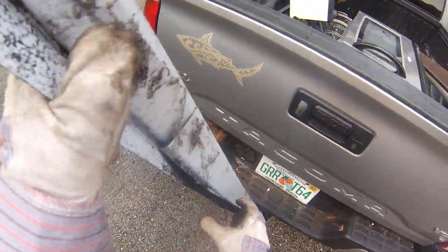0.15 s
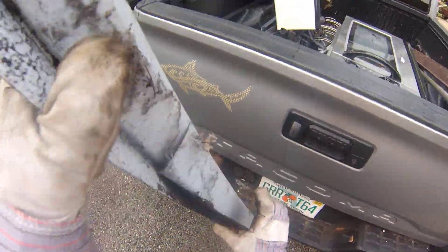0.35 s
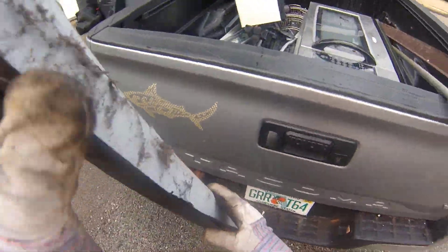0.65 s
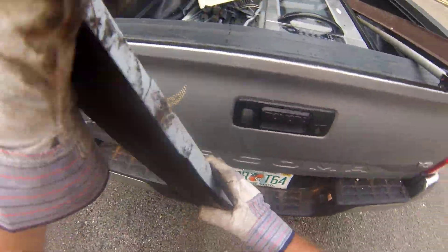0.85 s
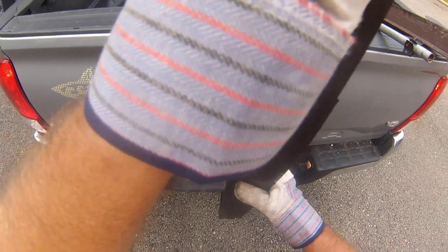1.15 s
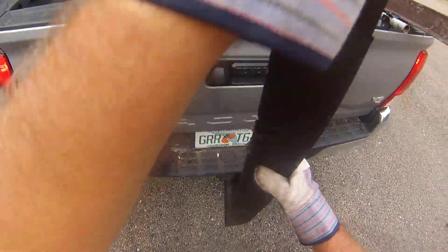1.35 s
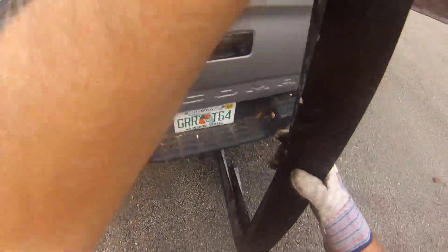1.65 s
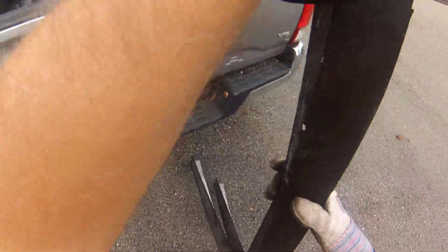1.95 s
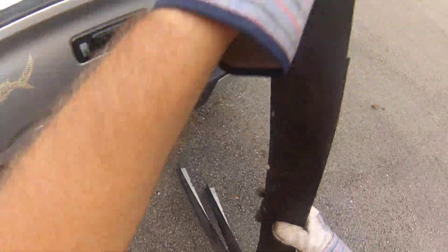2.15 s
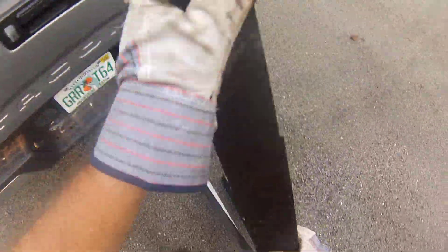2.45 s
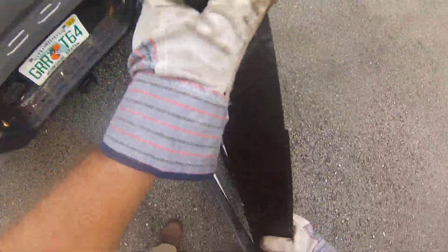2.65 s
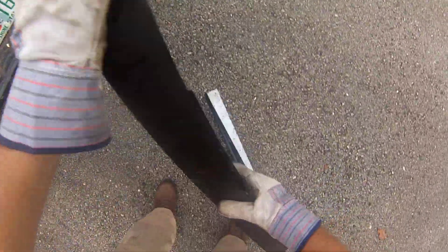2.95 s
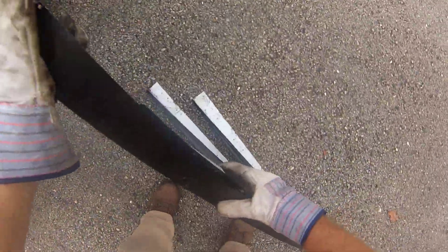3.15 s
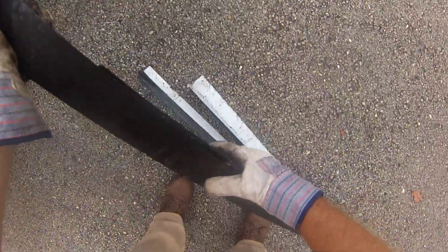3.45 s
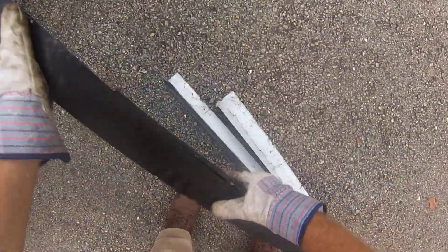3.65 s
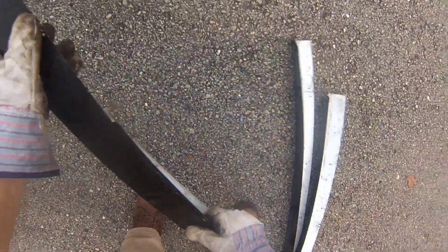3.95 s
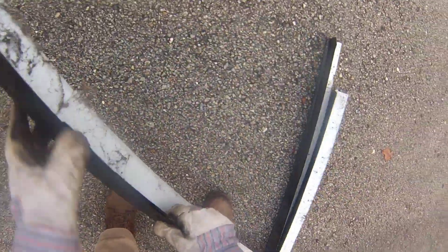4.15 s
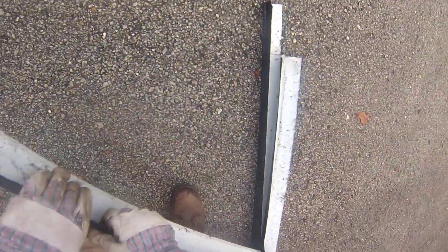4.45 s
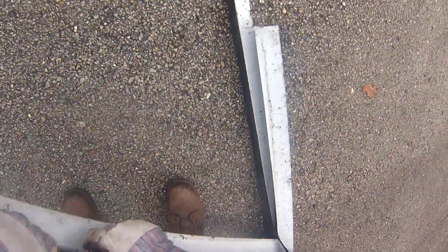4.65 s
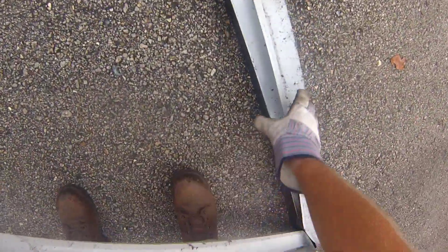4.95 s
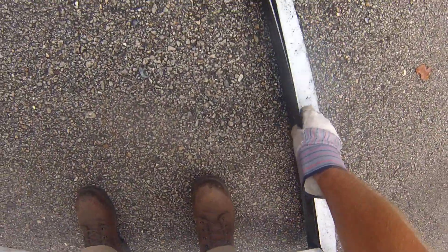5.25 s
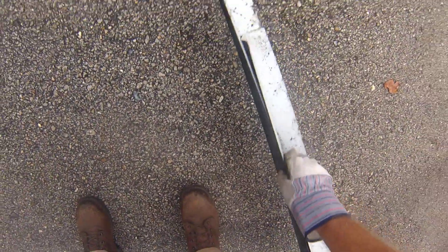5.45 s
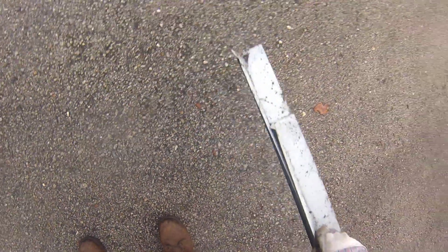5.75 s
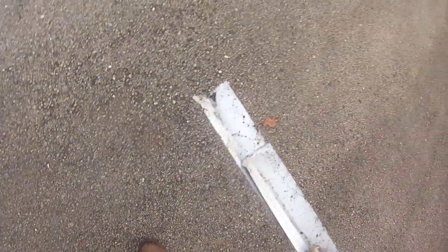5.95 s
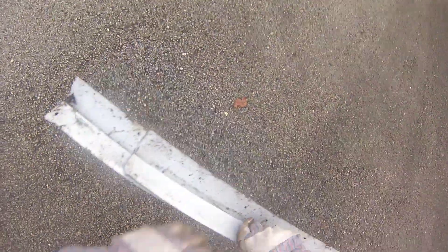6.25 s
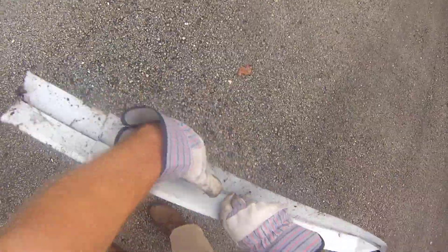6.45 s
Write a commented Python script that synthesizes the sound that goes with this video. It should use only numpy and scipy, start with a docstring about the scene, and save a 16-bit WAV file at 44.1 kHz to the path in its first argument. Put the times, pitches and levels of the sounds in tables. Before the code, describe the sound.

Close to the microphone, a long metal strip shifts with short scrapes and knocks, then drags loudly over rough asphalt with a gritty, ringing rasp and sharp clanks. It clicks and crunches as it is bent double, and a second, shorter drag follows. A few more knocks and a scrape thin out to light ticks. Outdoors, a faint engine hums in the distance and speeds up once.

```python
"""Sheet metal dragged over asphalt

Gloved hands drag a long metal strip over rough asphalt and fold it. Slips and knocks excite its damped
modes, and grit fizzes above them. Some way off, in faint outdoor hiss, an engine hums and speeds up
once, and something on it squeaks. A small camera close by lowers its gain under the two long drags."""
import sys
import numpy as np
from scipy import signal
from scipy.io import wavfile
from scipy.ndimage import uniform_filter1d

SR = 44100
rng = np.random.default_rng(int(sys.argv[2]) if len(sys.argv) > 2 else 0)


def dump(signal):
    """Clip the signal to [-1, 1] and save it as 16-bit WAV at the path in sys.argv[1]."""
    limited = np.clip(np.atleast_2d(signal).T, -1, 1)
    pcm = np.round(limited * 32767).astype(np.int16)
    wavfile.write(sys.argv[1], SR, pcm)


N = 290528


def gain_of(db):
    """Amplitude ratio of a level in decibels."""
    return 10 ** (np.asarray(db) / 20)


def unit_rms(x):
    """Normalisation to a mean power of one."""
    return x / np.sqrt(np.mean(x ** 2) + 1e-20)


def curves(rows):
    """Linear interpolation of each column over the time in the first."""
    times, *columns = np.transpose(rows)
    return [np.interp(np.arange(N) / SR, times, column) for column in columns]


def drift(rate_hz):
    """Low-pass noise: a smooth random fluctuation of rms 1."""
    size = max(int(SR / rate_hz), 2)
    return unit_rms(uniform_filter1d(uniform_filter1d(rng.standard_normal(N), size), size))


def colour(x, spectrum):
    """Minimum-phase filtering: a causal response of unit energy imposes a spectral shape."""
    hz, db = np.transpose(spectrum)
    bin_hz = np.fft.rfftfreq(8192, 1 / SR)
    log_gain = np.interp(np.log(bin_hz + 1), np.log(hz + 1), db, -70, -70) * np.log(10) / 20
    mirrored = np.r_[log_gain, log_gain[-2:0:-1]]
    taps = np.fft.ifft(np.exp(mirrored - 1j * signal.hilbert(mirrored).imag)).real[:4096]
    return signal.oaconvolve(x, taps / np.linalg.norm(taps))[:N]


def air():
    """Stationary coloured noise: far outdoor hiss."""
    # ambient spectrum: (frequency [Hz], relative density [dB])
    spectrum = [(120, -14), (200, 6.5), (333, -4.5), (506, -9.5), (715, 0.5), (1170, -9.5), (2170, -77),
                (5490, -46), (6130, -59), (15500, -53)]
    return gain_of(-50) * unit_rms(colour(rng.standard_normal(N), spectrum))


def engine():
    """Periodic firing gives harmonic orders, whose balance shifts with speed, over a noisy rumble."""
    # running speed: (time [s], cycle rate [Hz])
    speed = [(0, 17.5), (1, 17.1), (3.27, 17.2), (3.45, 19.3), (3.8, 20), (4.4, 21.2), (5, 21.6),
             (6.59, 21.7)]
    # strength of the hum: (time [s], level [dB])
    levels = [(0.0, -39.5), (2.7, -38.5), (2.95, -37), (3.27, -39.5), (3.36, -33.5), (3.72, -31),
              (3.86, -35), (4.2, -41), (4.4, -34), (5.7, -35), (6.0, -37.5), (6.59, -38.5)]
    # orders at three speeds: (multiple of the cycle rate, relative level [dB])
    idle_orders = [(1, -9), (2, 0), (3, -15), (4, -8), (5, -15), (6, -5), (7, -14), (8, -10)]
    rising_orders = [(1, -11), (2, -9.5), (3, -28), (4, -10), (5, -28), (6, 1.5), (7, -9.5), (8, -5)]
    fast_orders = [(1, 1.5), (2, -17), (3, -41), (4, 2), (5, -3), (6, 3.5), (7, -12.5), (8, -4.5), (9, -28),
                   (10, -18)]
    # rumble: (frequency [Hz], relative density [dB])
    rumble_spectrum = [(15, -45), (54, -4.5), (133, -2), (196, -13.5), (265, -9.5), (292, -22),
                       (400, -21.5), (520, -50)]
    (hz,), (level_db,) = curves(speed), curves(levels)
    cycles = np.cumsum(hz * (1 + 0.0067 * drift(7.1))) / SR
    fast = np.clip((hz - 20.3) / 0.5, 0, 1)
    rising = np.clip((hz - 17.7) / 0.37, 0, 1) * (1 - fast)
    tone = 0
    for share, orders in ((1 - fast - rising, idle_orders), (rising, rising_orders), (fast, fast_orders)):
        stack = sum(gain_of(db + 2.8 * drift(6)) * np.sin(2 * np.pi * (k * cycles + k * k / 7))
                    for k, db in orders)
        tone = tone + share * unit_rms(stack)
    tone /= np.sqrt(uniform_filter1d(tone ** 2, size=12000) + 1e-9)  # orders vary, the sum holds
    rumble = unit_rms(colour(rng.standard_normal(N), rumble_spectrum))
    return gain_of(level_db) * (tone + gain_of(-6.5) * rumble)


def squeaks(drop_hz=720, settle_s=.08):
    """Frequency modulation: three harmonics of a squeal on the engine glide down with a slight jitter."""
    # squeals, by their fifth harmonic: (start [s], duration [s], settling frequency [Hz], level [dB])
    squeals = [(4.4, .23, 6900, -64), (5.07, .09, 6980, -63), (5.69, .24, 7070, -62),
               (6.385, .25, 6960, -62)]
    # harmonics that carry: (harmonic number, relative level [dB])
    partials = [(4, -6), (5, 0), (6, -8)]
    out = np.zeros(N)
    for start, length, end_hz, level_db in squeals:
        at = np.arange(round(start * SR), round((start + length) * SR))
        fade = signal.windows.tukey(len(at), .35)[at < N]
        at = at[at < N]
        fifth_hz = end_hz + drop_hz * np.exp(-(at / SR - start) / settle_s)
        cycles = np.cumsum(fifth_hz * (1 + .011 * drift(400)[at])) / (5 * SR)
        tone = sum(gain_of(db + 2.5 * drift(40)[at]) * np.sin(2 * np.pi * k * cycles)
                   for k, db in partials)
        out[at] += tone * gain_of(level_db) * np.sqrt(2) * fade
    return out


def layer_powers(force_db, fizz_db, low_db, treble_db):
    """Relative levels add in decibels: the powers of the four layers of friction."""
    return gain_of([force_db, force_db + fizz_db, force_db + low_db, force_db + fizz_db + treble_db]) ** 2


def friction_levels(sag_db_per_s=62, lift_db_per_s=241):
    """Incoherent sources add in power: rubbing, drags and scrapes give four drive levels in dB."""
    # faint rubbing that slowly fades and changes colour: (time [s], force [dB], fizz [dB re force], low modes
    # [dB re force], treble [dB re fizz])
    rubbing = [(0, -49.5, -3.5, 6, -7), (2.9, -47, -5.5, 2, -11), (5.0, -47.5, -14.5, -1, -13),
               (6.59, -56.5, -6, -8, -3)]
    # the two long drags, one table each: columns as for the rubbing
    drags = [
        [(1.03, -35, -3.5, -8, -6), (1.1, -30, -6.5, 1, -7), (1.17, -17, -7, -11, -9.5),
         (1.2, -27, -7, 4, -13.5), (1.29, -26.5, -4, 4, -5.5), (1.36, -16, -3.5, -2, -8),
         (1.6, -9, -6, -8.5, -10), (2.0, -5, -6.5, -13, -7.5), (2.17, -17.5, -5.5, -1.5, -5.5),
         (2.24, -12.5, -6.5, -17, -5), (2.48, -10, -5.5, -4.5, -10.5), (2.62, -16.5, -8, -4.5, -10),
         (2.74, -37, -10.5, 2.5, -15), (2.86, -58, -17, 10, -14)],
        [(3.6, -34.5, -10.5, -3, -15), (3.69, -18, -11.5, -4, -8.5), (3.76, -8.5, -11.5, -8, -15),
         (3.92, -2.5, -16, -12.5, -14), (4.05, -9.5, -12, -6, -18.5), (4.2, -23, -13.5, -2, -18),
         (4.33, -24, -14.5, -6, -16), (4.42, -37.5, -26, -4, -26)],
    ]
    # short shifts of the strip: (start [s], rise [s], hold [s], the same four levels [dB])
    scrapes = [(0.267, 0.036, 0.1, -23.5, -9.5, -8.5, -10), (0.407, 0.011, 0.14, -25.5, -13.5, 0, -12.5),
               (0.55, 0.069, 0.15, -29.5, -8.5, 6.5, -8), (0.726, 0.019, 0.097, -33.5, -6, -2, -20),
               (0.798, 0.014, 0.088, -28.5, -14, 4, -10), (0.931, 0.012, 0.041, -41, -4.5, 5, -6),
               (2.735, 0.0038, 0.012, -44, 6, -10, -7), (2.932, 0.0044, 0.035, -50, 3, -11, -11),
               (2.958, 0.0083, 0.18, -23.5, -14, -31, -13), (3.057, 0.026, 0.12, -26, -7, -8, -13),
               (3.28, 0.011, 0.017, -21, -16.5, -14, -13.5), (3.368, 0.0041, 0.0082, -35, -3.5, -9, -22),
               (3.413, 0.009, 0.047, -32.5, -7, -2, -16), (3.498, 0.011, 0.019, -25.5, -24, -3.5, -15),
               (3.55, .01, 0.089, -34.5, -11, 0, -11), (4.417, 0.019, 0.055, -36, -11, -1.5, -9),
               (4.54, 0.011, 0.06, -41.5, -9.5, 7, -13), (4.61, 0.014, 0.11, -36.5, -14.5, -3, -11),
               (4.692, 0.045, 0.095, -34, -10.5, -1, -14), (4.79, 0.013, 0.13, -33, -28, -5, -30),
               (5.054, 0.042, 0.092, -29, -19, -13, -13), (5.175, 0.0084, 0.13, -20.5, -10.5, -3, -14.5),
               (5.375, 0.015, 0.12, -44, -11, 0, -4.5), (5.482, 0.016, 0.1, -46, -8.5, -3, -0.5),
               (5.573, .03, 0.034, -47.5, 2.5, -14, -15), (5.65, .005, 0.028, -38.5, -5, -7, -15),
               (6.162, 0.039, 0.019, -41.5, -8.5, -12, -8.5), (6.475, 0.0079, .11, -42, -13, -3.5, -6)]
    t = np.arange(N) / SR
    power = layer_powers(*curves(rubbing))
    for rows in drags:
        power += layer_powers(*curves(rows)) * (t > rows[0][0]) * (t < rows[-1][0])
    for start, rise, hold, *levels in scrapes:
        at = slice(round(start * SR), round((start + .5) * SR))
        age = t[at] - start
        attack = np.clip(age / rise, 0, 1) ** 2
        sag_db = sag_db_per_s * np.clip(age - rise, 0, hold)
        lift_db = lift_db_per_s * np.maximum(age - rise - hold, 0)  # the edge leaves the ground
        power[:, at] += layer_powers(*levels)[:, None] * (attack * gain_of(-sag_db - lift_db)) ** 2
    return 10 * np.log10(power)


def stones(per_s, spread_db, clump_db=0):
    """Shot noise: the edge catches on stones in many small slips and a few large, optionally clumped."""
    sizes = gain_of(spread_db * np.minimum(rng.exponential(1, N), 4)) * rng.choice([-1., 1.], N)
    impulses = sizes * (rng.random(N) < per_s / SR)
    return unit_rms(impulses) * gain_of(clump_db * drift(65))


def impacts(crest_db=11):
    """Impulsive excitation: a sharp blow and a dying rattle, as a knock drive and a crack drive."""
    # knocks and snaps: (time [s], knock level [dB], crack level [dB], nominal 60 dB decay time [s],
    # centre of the modes that the struck spot favours [Hz])
    hits = [(0.278, -34, -15.5, 0.09, 5000), (0.414, 3.5, 0, 0.02, 1100), (0.407, -3.5, -12, 0.044, 985),
            (0.542, -39, -32, 0.062, 5550), (0.596, -40, -29, .012, 5640), (0.619, -10, -28, 0.023, 1236),
            (0.652, -12.5, -18, 0.029, 1640), (0.68, -34, -17, 0.011, 3200), (0.692, -20, -24, 0.039, 1110),
            (0.731, -40, -20, .025, 5600), (0.748, -35, -22, 0.0078, 3600), (0.795, -10, -16, 0.052, 1125),
            (0.954, -40, -28, 0.087, 3900), (1.027, -35, -23.5, 0.14, 4100),
            (1.142, -4.5, -3.5, 0.056, 940), (1.224, -6.5, -12, 0.14, 860), (2.082, 3, 8, 0.095, 966),
            (2.208, 2.5, 1, 0.096, 1077), (2.294, -7, 6.5, 0.035, 980), (2.938, -30, -21, 0.037, 1000),
            (2.973, -14.5, -12, 0.18, 693), (2.972, -6.5, -20, 0.21, 1980), (3.295, -3, -21, 0.008, 1040),
            (3.312, -6, -18.5, 0.085, 1020), (3.423, -19, -30, 0.036, 1010), (3.5, -7.5, -46, 0.07, 1000),
            (3.523, -14, -22.5, 0.15, 1114), (3.652, -14.5, -15.5, 0.075, 1140),
            (3.731, 7.5, -7, 0.023, 1080), (3.772, 4.5, -22, 0.06, 1177), (4.062, 4, -4, 0.019, 1096),
            (4.547, -20, -45, 0.035, 1040), (4.602, -16.5, -41, 0.074, 1060),
            (5.092, -1.5, -36, 0.03, 1120), (5.092, -30, -20, 0.048, 3450), (5.097, -40, -27, 0.15, 5600),
            (5.165, -21, -24, 0.056, 4650), (5.186, 2.5, -3, 0.075, 950), (5.283, -22, -15, 0.092, 2230),
            (5.295, -12.5, -24, 0.11, 420), (5.516, -30, -27, 0.035, 2960), (5.546, -52, -32.5, 0.03, 7900),
            (5.668, -16.5, -16.5, 0.043, 1145), (6.377, -48, -31, 0.099, 990),
            (6.485, -31, -34, 0.042, 1000)]
    knock, crack = np.zeros((2, N + SR))
    knock_noise, crack_noise = rng.standard_normal((2, N + SR))
    t = np.arange(SR // 4) / SR
    blow = 5 * np.exp(-t / 0.00013)
    for start, knock_db, crack_db, t60, spot_hz in hits:
        at = slice(round(start * SR), round(start * SR) + len(t))
        spot = signal.iirpeak(spot_hz, Q=7, fs=SR)
        rattle = gain_of(-60 * t / max(t60, .01)) * (1 - np.exp(-t / .0015)) * knock_noise[at]
        push = .8 * blow + rattle
        focused = signal.lfilter(*spot, signal.lfilter(*spot, push))
        knock[at] += gain_of(knock_db - crest_db) * (.3 * push + 3.2 * focused)
        snap = (1 + 0.14 * blow) * gain_of(-60 * t / max(0.95 * t60, .005)) * crack_noise[at]
        crack[at] += gain_of(crack_db - crest_db) * (.6 * snap + 2.8 * signal.lfilter(*spot, snap))
    return knock[:N], crack[:N]


def modal_response(modes):
    """Modal superposition: damped sinusoids sum to an impulse response of unit energy."""
    t = np.arange(6000) / SR
    taps = sum(gain_of(db) * np.sqrt(width) * np.exp(-np.pi * width * t)
               * np.sin(2 * np.pi * hz * t) * (-1) ** k for k, (hz, width, db) in enumerate(modes))
    return taps / np.linalg.norm(taps)


def resonate(drive, modes, folded):
    """Forced vibration: the drive passes from the modes of the straight strip to those of the folded."""
    modes = np.array(modes)
    before = signal.oaconvolve(drive * (1 - folded), modal_response(modes[:, :3]))
    after = signal.oaconvolve(drive * folded, modal_response(modes[:, [0, 1, 3]]))
    return (before + after)[:N]


def flexing(x, shift_rms_s=0.001528):
    """Phase modulation: as the strip flexes, a wandering time shift makes its modes glide together."""
    return np.interp(np.arange(N) + shift_rms_s * SR * drift(6.8), np.arange(N), x)


def moving_contact(x, depth_db, bins, frames):
    """Varying modal coupling: as the strip bends and the contact moves, bands swell and fade at random."""
    spectra = signal.stft(x, nperseg=512, noverlap=384)[2]
    patches = rng.standard_normal(spectra.shape[::-1]).T
    patches = uniform_filter1d(patches, size=bins, axis=0)
    patches = unit_rms(uniform_filter1d(patches, size=frames, axis=1))
    excess_db = depth_db ** 2 * np.log(10) / 20  # mean power that the swells would add
    spectra *= gain_of(depth_db * patches - excess_db)
    return signal.istft(spectra, nperseg=512, noverlap=384)[1][:N]


def sheet_vibration(slips, knock, force_db, low_db, clump_db, folded):
    """Bending resonance: slips and knocks excite the low and middle modes of the sheet."""
    # lengthwise flexing and panel modes:
    # (frequency [Hz], bandwidth [Hz], relative level straight [dB], relative level folded [dB])
    low_modes = [(273, 32, -11, -31), (378.5, 46, -1, -2.5), (410, 21, -0.5, -4.5),
                 (468.4, 25.7, 7.5, -1.5), (501, 57, 9, 0), (578.6, 66, 2, -5)]
    panel_modes = [(754, 58, 3.5, -7.5), (856.5, 20, 0.5, -3), (921, 30, 4, -1), (962, 44, -1.5, -4.5),
                   (1003.3, 18.3, 5, 5), (1074.5, 32, 8, 2), (1129, 29, 3.5, -2), (1162.4, 15, 6.5, 3.5),
                   (1262, 23, 5.5, -0.5), (1332, 52, 0.5, -2.5), (1575, 65, -1.5, -15.5),
                   (1690, 35, 1.5, -2.5), (1730, 83, -1.5, -8.5), (1890, 29, -7, -10), (2030, 18, -10, -23)]
    # dense modes between them, straight and folded: (frequency [Hz], relative density [dB])
    dense_straight = [(88, -64), (150, -20.5), (487, -4), (618, -1.5), (1050, -8), (1430, -3), (3000, -30),
                      (3900, -51)]
    dense_folded = [(110, -88), (190, -37), (371, -11), (700, -12), (1040, -7.5), (1470, 0), (1760, -6.5),
                    (3000, -22), (4500, -56)]
    # gloves damp a knock: most of it dies at once in the dense modes
    thud = stones(2500, 0.73, clump_db) * gain_of(force_db - 0.5) + knock * gain_of(6.5)
    dense = colour(thud * (1 - folded), dense_straight) + colour(thud * folded, dense_folded)
    struck = resonate(knock * gain_of(-5), panel_modes, folded)
    scraped = flexing(resonate(slips, panel_modes, folded))
    low = resonate((slips + knock) * gain_of(low_db - force_db), low_modes, folded)
    return (scraped + struck) * gain_of(-1.5) + dense * gain_of(-8.5) + low * gain_of(-6)


def grit_noise(grit, crack, fizz_db, treble_db, folded):
    """Brief contacts have broad spectra: grains fizz, tick and ring the high modes."""
    # high modes:
    # (frequency [Hz], bandwidth [Hz], relative level straight [dB], relative level folded [dB])
    high_modes = [(2780, 22, 15, 6), (3430, 28, 21, 6), (4320, 19, -22, -1), (5270, 43, 20, 11),
                  (5520, 110, 26, 12), (7700, 380, 4, 9), (8300, 110, -5, 1)]
    # fizz of the grit and its sharp treble: (frequency [Hz], relative density [dB])
    fizz_spectrum = [(1060, -10.5), (1800, 6), (2120, 0.5), (2740, 2.5), (3520, 3.5), (4550, -3.5),
                     (5450, 2.5), (6500, -17), (7000, -5.5), (9100, -38), (15400, -120)]
    treble_spectrum = [(3530, -15), (6000, 0), (7430, -8), (8260, -3.5), (9420, -10), (12400, -8),
                       (15400, -25.5), (15800, -45)]
    clank = crack * gain_of(7)  # a crack rings the high modes more than the grit does
    ring = gain_of(-19.5 + 2 * folded) * flexing(resonate(grit + clank, high_modes, folded))
    grain_gain = gain_of(fizz_db - 6.5)
    grains = stones(per_s=180, spread_db=1.56) * grain_gain
    fizz = colour(grit + grains, fizz_spectrum) * gain_of(-3 * folded)
    sharp_grains = stones(per_s=180, spread_db=4) * grain_gain
    flicker = gain_of(2.2 * drift(50))
    treble = colour((grit + sharp_grains) * gain_of(treble_db - fizz_db) * flicker, treble_spectrum)
    return ring + fizz + treble


def strip(fold_s=3.27):
    """Source and resonator: friction and impacts drive a strip whose modes change balance at the fold."""
    force_db, fizz_db, low_db, treble_db = friction_levels()
    folded = np.clip((np.arange(N) / SR - fold_s) / 0.017, 0, 1)
    knock, crack = impacts()
    # hard scraping and the faintest rubbing are even; light scraping comes in clumps
    clump_db = np.clip((-8.5 - force_db) / 4.2, .7, 2.2) * np.clip((force_db + 53.5) / 10, .3, 1)
    slips = stones(per_s=2500, spread_db=1.72, clump_db=clump_db) * gain_of(force_db)
    grit = stones(per_s=7000, spread_db=1.72, clump_db=clump_db) * gain_of(fizz_db)
    crackle = stones(per_s=59, spread_db=3.6) * gain_of(np.minimum(fizz_db, -36) - 33)  # paint and grit
    body = sheet_vibration(slips, knock, force_db, low_db, clump_db, folded)
    highs = grit_noise(grit + crack + crackle, crack, fizz_db, treble_db, folded)
    return moving_contact(body, 2, bins=2, frames=30) + moving_contact(highs, 2.2, bins=5, frames=11)


def scene():
    """Linear superposition of the sources in one channel."""
    return (strip() + engine() + squeaks() + air())[None]


def record(dry, threshold_db=-17, sense_s=0.1, follow_s=0.032, ceiling=.62, cutoff_hz=15500):
    """Automatic gain control removes level above a threshold; soft saturation and a low-pass follow."""
    power_db = 10 * np.log10(abs(uniform_filter1d(dry ** 2, round(sense_s * SR))) + 1e-12)
    pole = np.exp(-1 / (follow_s * SR))
    cut_db = signal.lfilter([1 - pole], [1, -pole], np.maximum(power_db - threshold_db, 0))
    ducked = dry / gain_of(cut_db)
    saturated = ducked / (1 + abs(ducked / ceiling) ** 8) ** (1 / 8)
    lowpass = signal.firwin(511, cutoff_hz, window=("kaiser", 9), fs=SR)
    return signal.oaconvolve(saturated, lowpass[None], "same")


dry = scene()
out = record(dry)
dump(out)
```